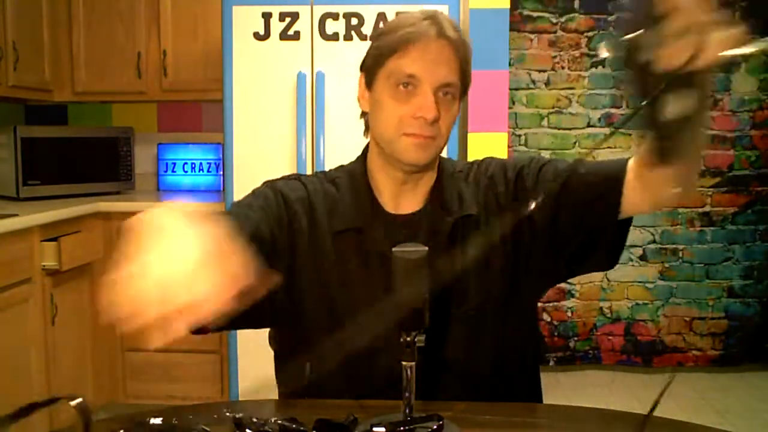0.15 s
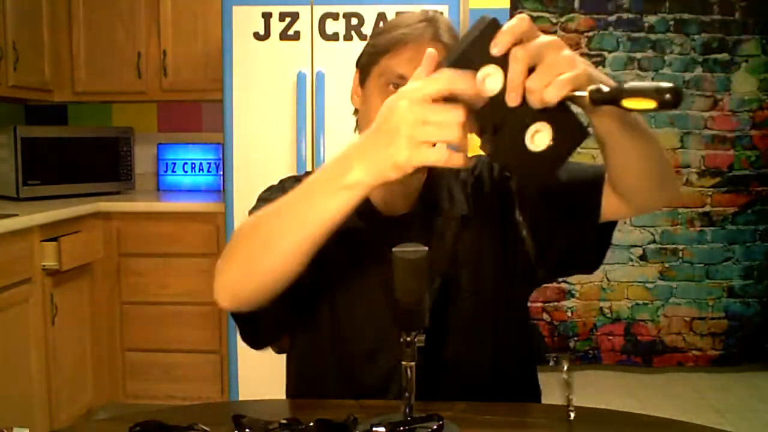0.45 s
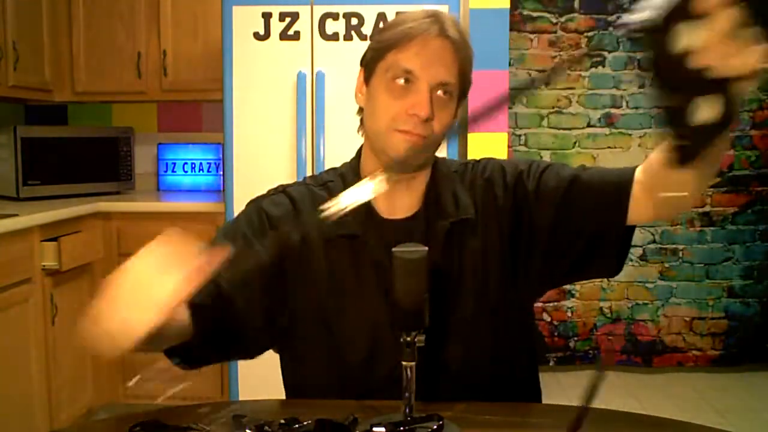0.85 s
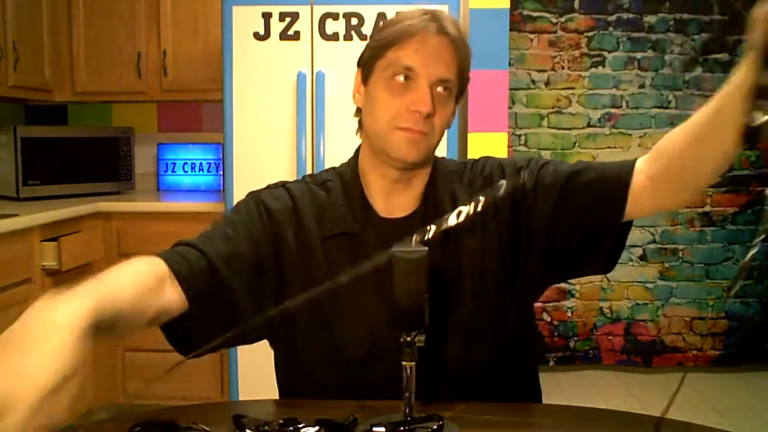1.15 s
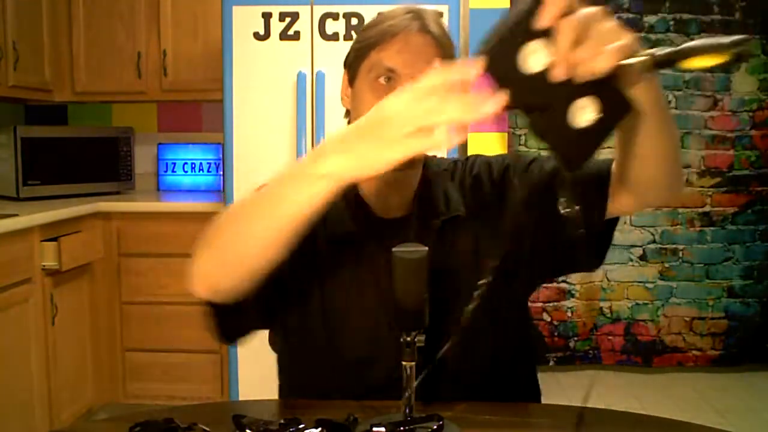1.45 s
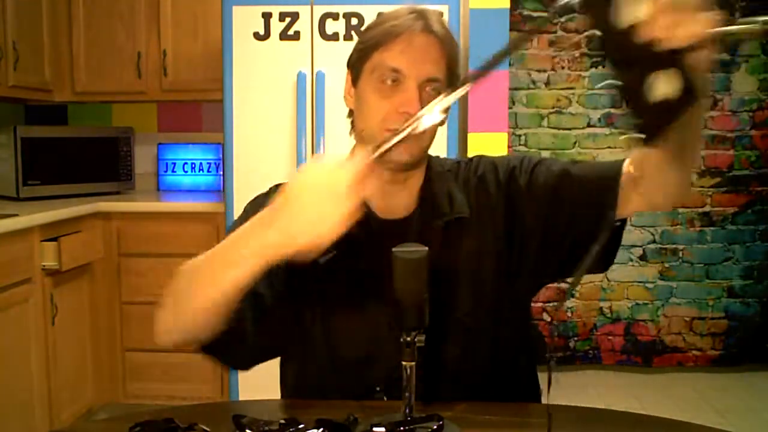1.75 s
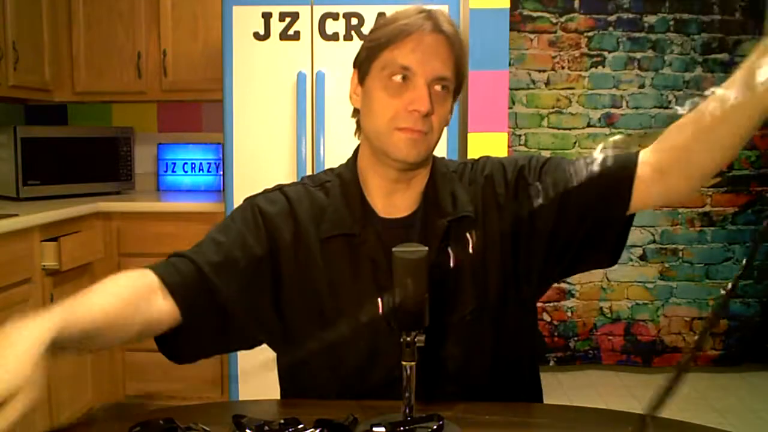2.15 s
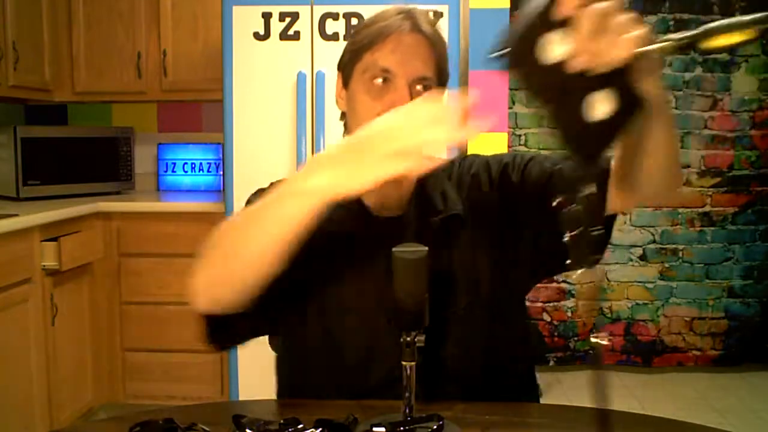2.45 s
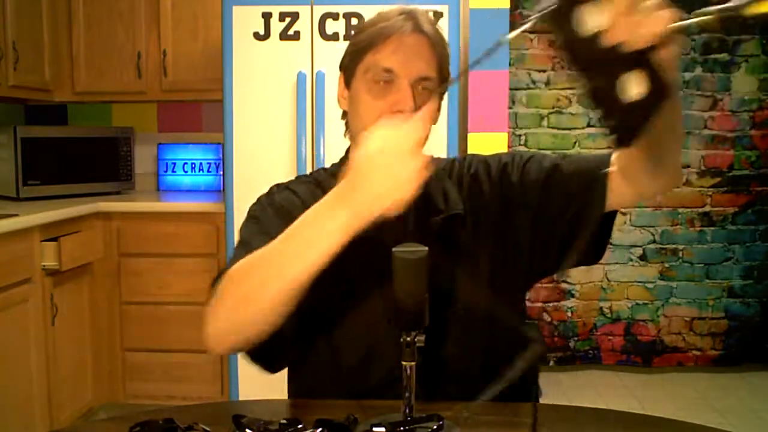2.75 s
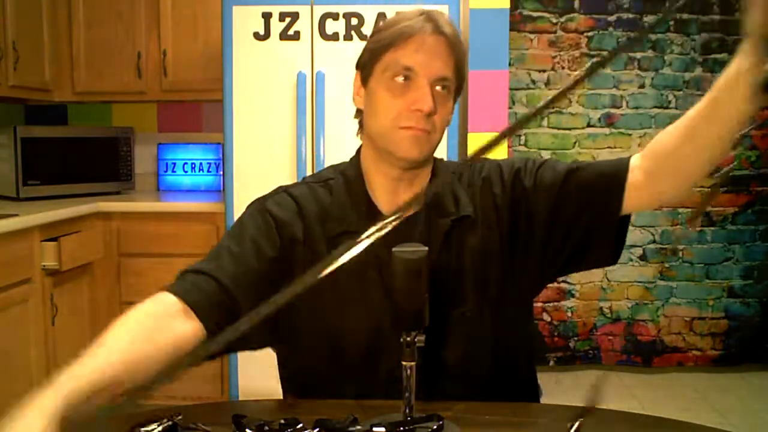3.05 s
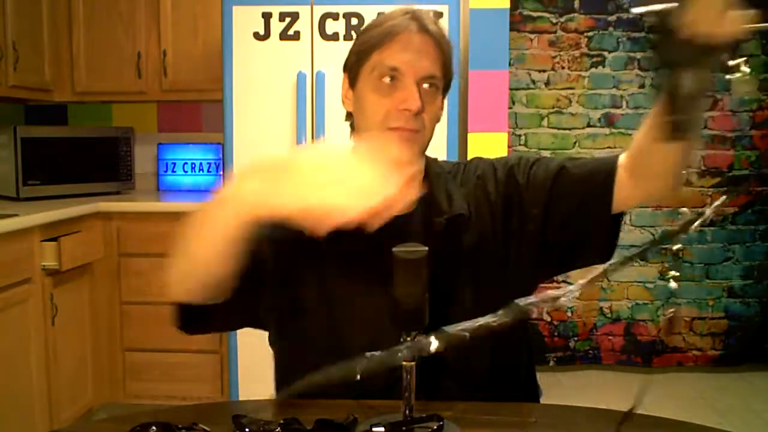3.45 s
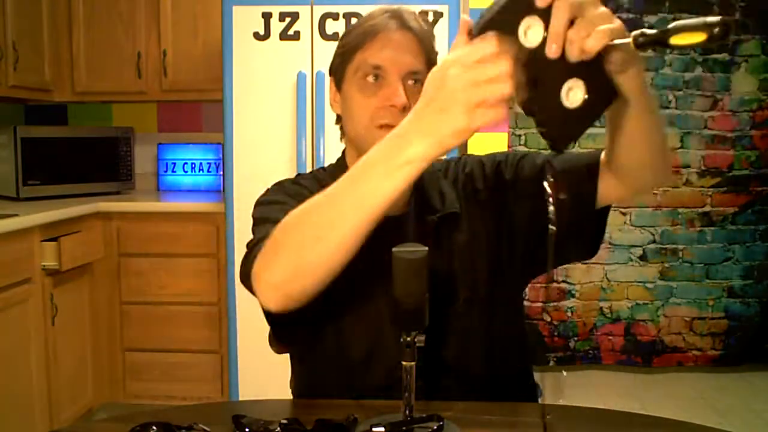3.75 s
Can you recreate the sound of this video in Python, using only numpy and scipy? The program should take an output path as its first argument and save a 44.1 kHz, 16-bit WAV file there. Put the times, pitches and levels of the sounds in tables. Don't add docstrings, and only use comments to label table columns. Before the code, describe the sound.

Tape pulled out of a plastic cassette three times, the reel whirring and rattling, fingers knocking between

```python
import sys
import numpy as np
from scipy import signal
from scipy.fft import rfft, irfft, next_fast_len
from scipy.io import wavfile
from scipy.ndimage import uniform_filter1d

SR = 44100
rng = np.random.default_rng(int(sys.argv[2]) if len(sys.argv) > 2 else 0)


def transcribe(u):
    v = np.clip(np.atleast_2d(u).T, -1, 1)
    q = np.round(v * 32767).astype(np.int16)
    wavfile.write(sys.argv[1], SR, q)


def makeup_ratio(level_db):
    decades = np.asarray(level_db, float) / 20
    return 10 ** decades


N = 171990


def rms_one(x):
    return x / np.sqrt(np.mean(x ** 2) + 1e-20)


def bandpass(x, order, low_hz, high_hz):
    return signal.sosfilt(signal.butter(order, [low_hz, high_hz], "band", fs=SR, output="sos"), x)


def along(tables, rest):
    t = np.arange(N) / SR
    out = np.ones((2, N)) * np.array(rest)[:, None]
    for rows in tables:
        time_s, first, second = np.transpose(rows)
        inside = (t >= time_s[0]) & (t <= time_s[-1])
        out[0, inside] = np.interp(t[inside], time_s, first)
        out[1, inside] = np.interp(t[inside], time_s, second)
    return out


def drift(rate_hz):
    r = np.exp(-2 * np.pi * rate_hz / SR)
    noise = rng.standard_normal(N + SR)
    return rms_one(signal.lfilter([1], [1, -2 * r, r * r], noise)[SR:])


def coloured(sources, spectrum, patchy_db):
    hz, db = np.transpose(spectrum)
    edges = 22 * 2 ** np.arange(0, 9.6, .5)
    out = 0
    for k, (low, high) in enumerate(zip(edges, edges[1:])):
        band = bandpass(sources[k % 2], 2, low, high)
        level_db = np.interp(np.log(low * high) / 2, np.log(hz), db)
        out = out + band * makeup_ratio(level_db + patchy_db * drift(11.7))
    return rms_one(out)


def grains(per_s, spread_db, size):
    sizes = makeup_ratio(spread_db * np.minimum(rng.exponential(1, size), 5)) * rng.choice([-1, 1], size)
    return rms_one(sizes * (rng.random(size) < per_s / SR))


def whistle(tables, multiples, flutter_hz):
    pitch_hz, level_db = along(tables, [1000, -120])
    waver = 1 + .012 * drift(24.7)
    phase = 2 * np.pi * np.cumsum(pitch_hz * waver) / SR
    tone = 0
    for k, db in multiples:
        fluttering = drift(flutter_hz) * np.cos(k * phase) + drift(flutter_hz) * np.sin(k * phase)
        tone = tone + makeup_ratio(db) * fluttering
    return makeup_ratio(level_db) * tone


# pitch_hz, width_hz, level_db
SHELL = [(414, 68, -11), (697, 35, -2.5), (830, 96, -4), (980, 130, -5), (1157, 49, -3.5),
         (1300, 360, -3.5), (1668, 60, -7), (2150, 45, -7.5), (2530, 320, -9), (3740, 370, -2.5),
         (4500, 390, -10.5), (5840, 160, -14)]


def shell(force):
    out = 0
    for k, (hz, width_hz, db) in enumerate(SHELL):
        r = np.exp(-np.pi * width_hz / SR)
        gain = (1 - r * r) / 2 * np.sqrt(SR / width_hz / 20)
        ring = [1, -2 * r * np.cos(2 * np.pi * hz / SR), r * r]
        out = out + makeup_ratio(db) * signal.lfilter([gain, 0, -gain], ring, force[k] + 1e-18)
    return out


def reel_rattle(drive):
    taps = grains(2500, 2.78, size=(len(SHELL), N))
    grip = makeup_ratio([3 * drift(9.8) for _ in SHELL])
    return shell(taps * makeup_ratio(-5) * drive * grip)


# pitch_hz, level_db
RUB = [(25, -22), (70, -40), (285, -26), (698, -5.5), (1170, 3.2), (1930, 1.5), (3500, -21.5), (5000, -50)]


def shell_rub(drive):
    return makeup_ratio(-7) * drive * coloured(rng.standard_normal((2, N)), RUB, patchy_db=3.0)


# pitch_hz, level_db
HISS = [(1470, -29), (2500, 0.5), (3050, -1.5), (3750, 5), (4400, 0.5), (8420, -2), (13000, -16.5),
        (16000, -35)]


def tape_hiss(drive):
    return drive * coloured(grains(8000, 3.1, size=(2, N)), HISS, patchy_db=2.25)


# start_s, scuff_level_db, rustle_over_scuff_db
GRIPS = [
    [(0, -36, -13), (.08, -50, -2), (.2, -70, -3)],
    [(.445, -65, -1), (.452, -36, -12), (.472, -39.5, -16), (.49, -28, -12), (.6, -45.5, -10)],
    [(1.5, -75, -10), (1.515, -46, -12), (1.555, -46, 1), (1.6, -51.5, 1.5), (1.713, -67, 8.5)],
    [(2.538, -79, -5), (2.545, -30.5, -19), (2.63, -38.5, -11), (2.68, -46.5, -7), (2.72, -46.5, -2.5),
     (2.76, -54.5, -3.5), (2.81, -53.5, -9)],
    [(3.683, -83, -5), (3.69, -32, -32), (3.76, -43, 0.5), (3.8, -47, -3), (3.9, -63, 7)],
]
# start_s, rattle_level_db, hiss_over_rattle_db (tape tension)
PULLS = [
    [(.585, -44, -13), (.6, -33, -1), (.622, -26.5, -14.5), (.72, -31, -1.5), (.9, -32, 1),
     (.975, -28.5, -2), (1.0, -31.5, -5.5), (1.2, -45.5, -10), (1.36, -71, -4)],
    [(1.713, -34, 4.5), (1.73, -27.5, -1), (1.77, -26.5, -5), (1.84, -25.5, -2.5), (1.97, -31.5, 3.5),
     (2.02, -30.5, -6.5), (2.12, -39, -9.5), (2.19, -38.5, -11.5), (2.4, -72, -1)],
    [(2.808, -47, 5), (2.835, -27.5, -2.5), (2.89, -28.5, -6), (3.0, -27, 0), (3.04, -24, -6.5),
     (3.1, -31.5, -3), (3.2, -33, -19), (3.3, -43, -19.5), (3.45, -57, -12)],
]


def cassette():
    level_db, tension_db = along(GRIPS + PULLS, [-120, 0])
    drive = makeup_ratio(level_db) * makeup_ratio(.5 * drift(53))
    return reel_rattle(drive) + shell_rub(drive) + tape_hiss(drive * makeup_ratio(tension_db))


# pitch_hz, level_db
AIR = [(25, -39), (90, -28.5), (200, -13), (389, -4), (1340, -10.5), (2360, -18.5), (8350, -25),
       (15000, -38.5)]


def room_tone():
    air = makeup_ratio(-53.5) * coloured(rng.standard_normal((2, N)), AIR, patchy_db=2.0)
    hum = makeup_ratio(-68) * np.sin(2 * np.pi * 2616 * np.arange(N) / SR)
    return air + hum


def room(x):
    t60_s, wall_cut_hz = .6, 3400
    size = next_fast_len(N + SR)
    z = 2j * np.pi * np.arange(size // 2 + 1) / size
    dull = np.exp(-2 * np.pi * wall_cut_hz / SR)
    wall = (1 - dull) / (1 - dull * np.exp(-z))
    lags_s = np.geomspace(.009, .037, 10) * rng.uniform(.95, 1.05, 10)
    echo = 0
    for k, lag in enumerate(lags_s):
        trip = makeup_ratio(-60 * lag / t60_s) * wall * np.exp(-z * int(lag * SR))
        echo = echo + (-1) ** k * trip / (1 - trip)
    return irfft(rfft(x, size) * echo, size)[:N]


# start_s, peak_db, pitch_hz
CRINKLES = [(0.042, -32, 9000), (0.073, -34, 8000), (.093, -38, 7500), (.1281, -39, 5800),
            (.148, -43, 8000), (.17, -45, 6000), (.2653, -57, 8300), (0.2776, -42.5, 6900),
            (.29, -48, 6000), (0.363, -39, 6000), (.385, -44, 7000), (.42, -38, 4500), (.4274, -40, 8000),
            (0.433, -37, 9700), (0.593, -23.5, 6200), (1.2476, -40, 4000), (1.3216, -41, 5500),
            (1.4396, -46, 5500), (1.508, -39.5, 8500), (1.517, -44, 4500), (1.537, -33, 5700),
            (1.5482, -26, 7060), (1.554, -28, 5000), (1.569, -35, 10000), (1.573, -34, 5200),
            (1.588, -45, 9000), (1.594, -40, 5500), (1.605, -45, 4600), (1.651, -45, 9500),
            (1.665, -41, 7500), (2.1605, -37, 7500), (2.3338, -41, 7500), (2.3775, -52, 4200),
            (2.5973, -26, 6540), (2.606, -34, 6500), (2.629, -37, 8500), (2.6543, -36, 9500),
            (2.697, -39, 7000), (2.712, -42, 6500), (2.724, -47, 9500), (2.738, -43, 9000),
            (2.757, -47, 8500), (2.774, -43, 8000), (3.323, -39, 7500), (3.3493, -52, 4500),
            (3.4052, -45, 7500), (3.468, -43, 8500), (3.6118, -41, 7500), (3.7254, -30, 9500),
            (3.7426, -28, 5000), (3.7644, -32, 5000), (3.81, -24, 7200), (3.8257, -29.5, 9000),
            (3.8924, -33, 6500)]


def crinkles():
    decay_s, rise_s, span = .003, .0008, 1.47
    t = np.arange(1000) / SR
    envelope = np.exp(-t / decay_s) * np.minimum(t / rise_s, 1)
    dense = grains(12000, 2.5, size=N + 1000)
    snaps = np.zeros(N + 1000)
    for s, db, hz in CRINKLES:
        i = int(s * SR)
        burst = dense[i:i + len(t)] * makeup_ratio(db) * envelope
        snaps[i:i + len(t)] += bandpass(burst, 2, hz / span, min(hz * span, 12500))
    snaps = snaps[:N]
    return snaps + makeup_ratio(-12) * shell([snaps] * len(SHELL))


# start_s, peak_db, contact_s
KNOCKS = [(0.4482, -15, 0.0037), (0.4765, -9, 0.0016), (0.4782, -7, 0.0012), (0.4797, -9, 0.0039),
          (0.607, -18, 0.014), (1.516, -38, 0.006), (1.717, -16, 0.01), (1.732, -7.5, 0.0083),
          (1.983, -15, 0.0059), (2.542, -25, 0.0072), (2.552, -16, 0.0021), (2.6, -22.5, 0.014),
          (2.813, -19, 0.006), (2.831, -7.5, 0.0045), (2.837, -10, 0.0076), (3.026, -10, 0.003),
          (3.189, -21, 0.0051), (3.226, -19.5, 0.0027), (3.689, -23, 0.0023), (3.746, -22.5, 0.0043)]


def knocks():
    t = np.arange(4410) / SR
    touch = np.zeros(N + len(t))
    for s, db, contact_s in KNOCKS:
        i = int(s * SR)
        touch[i:i + len(t)] += makeup_ratio(db) * np.exp(-t / max(contact_s, .001))
    touch = touch[:N]
    tick = 2 * np.maximum(np.diff(touch, prepend=0), 0)
    ring = shell((grains(3000, 1.5, size=(len(SHELL), N)) * touch + tick) * makeup_ratio(-7.5))
    chatter = grains(8000, 2.5, size=N) * touch + tick
    return ring + makeup_ratio(-12) * bandpass(chatter, 3, 700, 7500)


# start_s, pitch_hz, level_db
DRONES = [
    [(.655, 705, -47), (.68, 712, -33), (.735, 722, -34), (.755, 722, -48)],
    [(1.72, 1690, -38), (1.85, 1670, -38), (1.93, 1680, -46), (2.0, 1730, -39), (2.09, 1700, -48)],
    [(2.9, 1650, -48), (2.96, 1660, -40), (3.02, 1660, -33), (3.11, 1690, -37), (3.2, 1650, -50)],
]


def shell_drone():
    return whistle(DRONES, [(1, 0)], flutter_hz=65)


# start_s, pitch_hz, level_db
WHINES = [
    [(.74, 900, -37), (.775, 1000, -32), (.81, 1110, -25.5), (.84, 1190, -38.5), (.865, 1240, -22.5),
     (.91, 1300, -27.5), (.935, 1280, -42), (.98, 1280, -32.5), (1.02, 1290, -53)],
    [(1.72, 1122, -28), (1.745, 1167, -29), (1.79, 1160, -38), (1.82, 1180, -26.5), (1.845, 1230, -36),
     (1.88, 1290, -29), (1.95, 1400, -28), (1.985, 1450, -39)],
    [(2.83, 891, -46), (2.872, 1028, -15), (2.89, 1105, -43), (2.93, 1200, -25), (2.97, 1282, -33),
     (3.0, 1420, -31), (3.03, 1550, -40)],
]
# second_db, third_db
WHINE_OVERTONES = [
    (-3, -14),
    (-18, -20),
    (-13, -18),
]


def roller():
    whine = 0
    for rows, (second_db, third_db) in zip(WHINES, WHINE_OVERTONES):
        whine = whine + whistle([rows], [(1, 0), (2, second_db), (3, third_db)], flutter_hz=90)
    whine = whine * makeup_ratio(6 * np.minimum(drift(30), .3))
    through_shell = shell([(-1) ** k * whine for k in range(len(SHELL))])
    return makeup_ratio(-2.5) * whine + makeup_ratio(-24.5) * through_shell


# start_s, pitch_hz, level_db
SQUEAK = [
    (.75, 8300, -55),
    (.762, 8500, -35),
    (.778, 8750, -47),
    (.795, 8500, -40),
    (.82, 8800, -50),
]
# start_s, pitch_hz, level_db
SLACK = [
    (2.738, 400, -58),
    (2.775, 470, -50),
    (2.81, 520, -54),
]


def tape_squeak():
    return whistle([SQUEAK, SLACK], [(1, .005)], flutter_hz=76)


# start_s, peak_db, pitch_hz, push_s
BUMPS = [
    (1.733, -18, 740, .008),
    (2.176, -36, 450, .008),
    (2.836, -14, 720, .008),
    (3.024, -15, 520, .002),
    (3.036, -22, 450, .006),
    (3.046, -22, 480, .005),
    (3.078, -27, 440, .006),
]


def bumps():
    ratios, cycles = (.87, 1, 1.22), 9
    t = np.arange(4000) / SR
    out = np.zeros(N)
    for s, db, hz, push_s in BUMPS:
        push = rng.standard_normal((len(ratios), len(t))) * np.exp(-t / push_s)
        ring = 0
        for force, ratio in zip(push, ratios):
            r = makeup_ratio(-60 * hz * ratio / (cycles * SR))
            w = 2 * np.pi * hz * ratio / SR
            ring = ring + signal.lfilter([np.sin(w)], [1, -2 * r * np.cos(w), r * r], force + 1e-18)
        ring = bandpass(ring, 2, hz / 1.4, hz * 1.7)
        i = int(s * SR)
        out[i:i + len(t)] += makeup_ratio(db) * ring / np.abs(ring).max()
    return out


def scene():
    tones = shell_drone() + roller() + tape_squeak()
    mic_low_cut = signal.butter(4, 172, "high", fs=SR, output="sos")
    hits_and_tones = signal.sosfilt(mic_low_cut, knocks() + bumps() + tones)
    near = cassette() + crinkles() + hits_and_tones
    return (near + makeup_ratio(-21.5) * room(near) + room_tone())[None]


def top_cut(x):
    return signal.sosfilt(signal.butter(12, 15830, fs=SR, output="sos"), x)


# from_hz, treble_needed_db
TOP_BANDS = [(13640, -56), (14330, -45), (15030, -37)]


def record(dry):
    peak_limit = .45
    rounded = peak_limit * np.tanh(dry / peak_limit)
    hz, _, spec = signal.stft(rounded, SR, nperseg=1024)
    treble = spec[:, (hz > 8000) & (hz < 13000)]
    treble_db = 10 * np.log10(1.33 * np.sum(np.abs(treble) ** 2, axis=1) + 1e-20)
    treble_db = uniform_filter1d(treble_db, size=5, axis=-1)
    for from_hz, need_db in TOP_BANDS:
        silent = (hz > from_hz)[:, None] & (treble_db < need_db)[:, None]
        spec = spec * np.where(silent, 0, 1)
    mix = signal.istft(spec, SR, nperseg=1024)[1][:, :N]
    return top_cut(mix)


dry = scene()
out = record(dry)
transcribe(out)
```